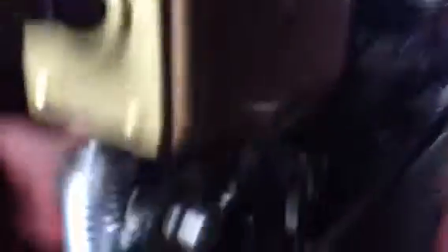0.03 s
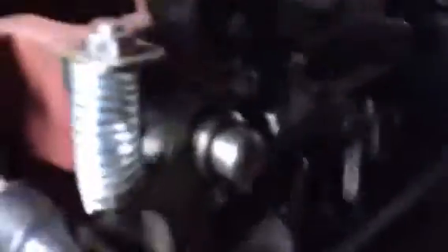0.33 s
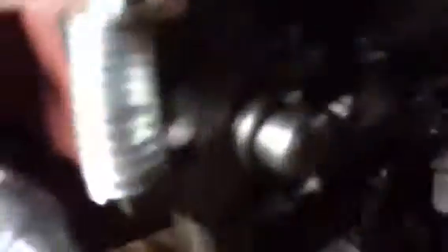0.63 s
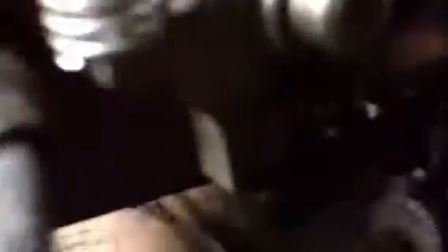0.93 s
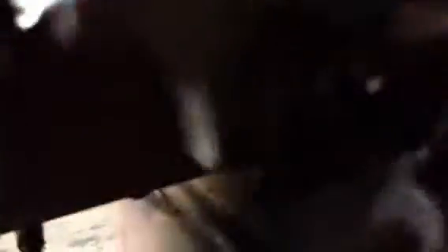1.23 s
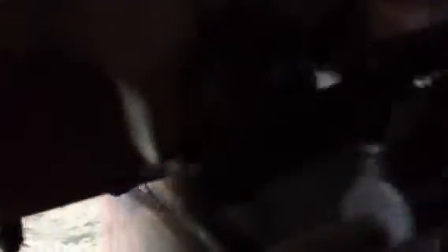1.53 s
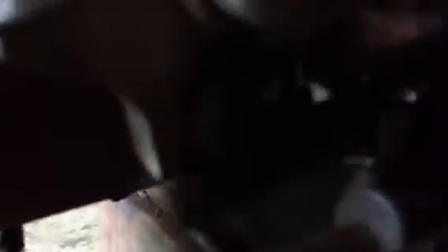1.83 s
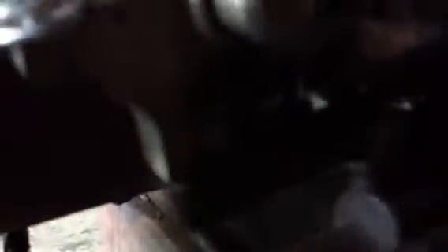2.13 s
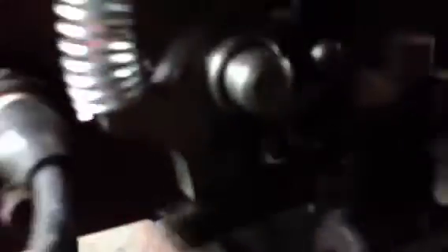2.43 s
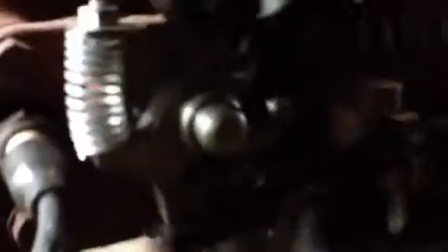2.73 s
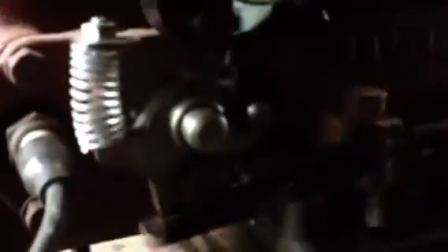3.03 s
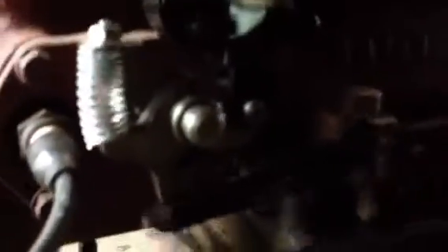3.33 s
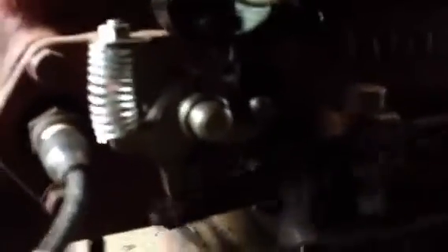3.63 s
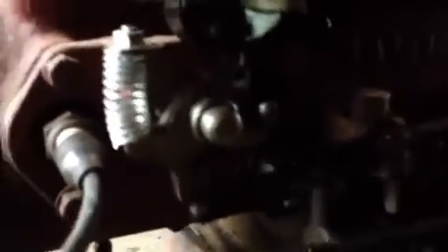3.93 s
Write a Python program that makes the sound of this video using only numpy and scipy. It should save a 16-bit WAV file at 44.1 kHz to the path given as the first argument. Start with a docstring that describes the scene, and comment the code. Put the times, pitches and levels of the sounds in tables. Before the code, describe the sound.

An old single-cylinder engine clatters close by in a shed, about three and a half beats a second. Each beat has a sharp steel tap, loose rattles, a double clack and a hollow chuff over whirring gears. Roughly every third fires with a knock, hiss and deeper thump. At 1.1 seconds the sound cuts out, returning briefly louder at 1.4 and running steadily until about 4 seconds.

```python
"""Old single-cylinder engine in a shed

The microphone is close to the valve gear as the engine turns over slowly. Each cycle brings a sharp
steel tap, loose rattles, a double clack and a hollow chuff of gas; about every third one fires with
a knock, a hiss and a deeper thump. Gears whirr underneath and the near walls add a short tail.
Just after one second the sound cuts out for a third of a second, then comes back briefly louder."""
import sys
import numpy as np
from scipy import signal
from scipy.io import wavfile
from scipy.ndimage import uniform_filter1d

SR = 44100
rng = np.random.default_rng(int(sys.argv[2]) if len(sys.argv) > 2 else 0)


def store_pcm(level_fs):
    """Save levels as 16-bit WAV."""
    pcm = np.round(np.clip(level_fs, -1, 1) * 32767).astype(np.int16)
    wavfile.write(sys.argv[1], SR, np.atleast_2d(pcm).T)


N = 176400
TIME = np.arange(N) / SR
AFTER_DB, AFTER_S = -20, .013  # after-ring of a steel contact: level and decay time
RATTLE_SPREAD_DB = 1.6

# Engine cycles. Each row: time of the tap in seconds, 1 if it fires or 0 if it coasts,
# then the gains in dB of tap, clack, knock and chuff.
CYCLES = [(-.269, 0, 0, 0, 0, 0), (.018, 0, 0, -1, -8, -2), (.305, 1, -3, 0, -1, 0), (.590, 0, 0, 1, -8, 0),
          (.876, 1, -1, 1, -3, 0), (1.16, 0, 0, 0, -8, -1), (1.447, 1, 0, 0, -4, -1),
          (1.732, 0, -1, 0, -7, 0), (2.017, 0, 0, 0, -8, 0), (2.306, 1, -2, 0, 0, 0),
          (2.5928, 0, 1, 1, -7, 0), (2.8805, 0, -1, 1, -5, 0), (3.1722, 1, -3, 0, 1, 1),
          (3.4605, 0, 0, 1, -5, 1.5), (3.7493, 1, -2, 0, 2, 0)]
# Resonances of the casting and the valve port. Each row: centre in Hz, width in Hz, strength in dB.
CASTING_MODES = [(195, 25, -2), (350, 16, 3), (568, 34, 1), (750, 24, 5), (920, 30, -2), (1125, 45, 4),
                 (1310, 45, -6), (1861, 40, 3)]
PORT_MODES = [(1660, 100, 0), (2330, 50, 3), (2860, 70, 1), (3260, 45, 12), (3730, 35, 5), (5260, 80, 7)]


def valve_gear():
    """Tap, double clack and the rattles of a loose linkage ring the same steel parts."""
    # Blows. Each row: seconds into the cycle, level in dB, decay in seconds.
    taps = [(.0003, -6.7, .002), (.0062, -14.5, .0023)]
    clacks = [(.0783, -9.3, .0024), (.0853, -14.5, .0028), (.0893, -8.7, .003)]
    # Each row: seconds into a firing cycle, seconds into a coasting one, level in dB, length in seconds.
    rattles = [(-.023, -.023, -28, .004), (-.018, -.014, -23.5, .008), (-.006, -.005, -30, .005),
               (.012, .017, -19.5, .008), (.036, .04, -22, .012), (.057, .06, -24.5, .009),
               (.13, .136, -30, .009), (.236, .236, -31, .004), (.254, .251, -35, .005)]
    # Each: start in seconds, level in dB, length in seconds.
    latch = (.161, -19.5, .009)  # timed within each coasting cycle
    return_rattle = (1.4245, -15, .007)  # the usual rattle before the tap, louder as the sound returns
    # Spectra. Each row: frequency in Hz, relative level in dB.
    tap_colour = [(100, -26), (800, -14), (1800, -10), (3800, -5), (6000, -4), (8000, 0), (9800, -8.5),
                  (13200, 1), (15500, -7)]
    clack_colour = [(100, -25), (600, -7), (1100, -.5), (2300, 0), (3100, -3.5), (4200, -1.5), (6500, 0),
                    (8300, .5), (9800, -6), (12500, -2), (15500, -8)]
    rattle_colour = [(100, -35), (1500, -14), (3500, -11), (6000, -8), (7500, 1), (8600, -3), (9800, -14),
                     (12500, -8.5), (15500, -16)]
    # Resonances. Each row: centre in Hz, width in Hz, strength in dB.
    steel_modes = [(2370, 120, 3), (2890, 120, 0), (3920, 140, 2), (4540, 80, 2), (5285, 80, 1),
                   (6046, 50, 2), (7690, 90, 2), (8820, 70, 4), (12100, 120, 0), (12570, 80, 1),
                   (13500, 140, 1)]
    loose = np.zeros(N)
    for start, fires, *_ in CYCLES:
        rows = [(firing if fires else coasting, db, length) for firing, coasting, db, length in rattles]
        for offset, db, length in rows + ([] if fires else [latch]):
            jitter = .0005 * rng.standard_normal()
            add(loose, start + offset + jitter, rattle(db, length))
    add(loose, return_rattle[0], rattle(*return_rattle[1:]))
    tap = blows(taps, [(start, db) for start, _, db, *_ in CYCLES])
    clack = blows(clacks, [(start, db) for start, _, _, db, *_ in CYCLES])
    return (colour(tap, tap_colour, steel_modes) + colour(clack, clack_colour, steel_modes)
            + colour(loose, rattle_colour, steel_modes))


def blows(contacts, starts, alike=.45, contact_s=.00018, spread_db=.9):
    """Hard steel contacts: a dense burst that is partly the same each time, and a short after-ring."""
    out, t = np.zeros(N), TIME[:SR // 12]
    for offset, db, decay in contacts:
        common = rng.standard_normal(len(t))
        attack = np.minimum(t / contact_s, 1)
        shape = attack * (np.exp(-t / decay) + amp(AFTER_DB) * np.exp(-t / AFTER_S))
        for start, gain_db in starts:
            burst = np.sqrt(alike) * common + np.sqrt(1 - alike) * rng.standard_normal(len(t))
            level = amp(db + gain_db + spread_db * rng.standard_normal())
            add(out, start + offset, level * shape * burst)
    return out


def rattle(db, length, contacts_per_s=800, decay_s=.0011):
    """A loose part chatters: a quick cluster of tiny contacts that swells and fades."""
    t, power = TIME[:SR // 20], 0
    count = max(round(contacts_per_s * length), 1)
    for k, (when, force) in enumerate(rng.random((16, 2))[:count]):
        age = np.maximum(t - (k + when) * length / count, 0)
        arch = np.sin(np.pi * (k + .5) / count)
        ring = np.exp(-age / decay_s) + amp(AFTER_DB) * np.exp(-age / AFTER_S)
        power = power + arch * (.5 + force) * (age > 0) * ring ** 2
    level = amp(db + RATTLE_SPREAD_DB * rng.standard_normal())
    return level * np.sqrt(power * length * SR / power.sum()) * rng.standard_normal(len(t))


def cylinder():
    """A knock tops each compression and the body knocks too; a firing adds clank, spit and hiss."""
    # Swells. Each: seconds into the cycle, level in dB, then rise, hold and decay in seconds.
    knock_swell = (.1428, -18, .0015, .015, .012)
    spit_swell = (.1525, -18, .003, .003, .004)
    hiss_swell = (.158, -27, .01, .012, .028)
    clank_swell = (.154, -26.5, .002, .004, .005)
    body_swells = [(-.014, -28, .008, .008, .01), (.03, -32, .006, .02, .02), (.058, -30, .004, .008, .015),
                   (.085, -26.3, .006, .01, .026), (.165, -32, .008, .015, .015)]
    return_swell = (1.416, -18.5, .002, .024, .012)  # a loud low surge as the sound returns, timed from the scene's start
    # Spectra. Each row: frequency in Hz, relative level in dB.
    knock_colour = [(80, -30), (250, -9), (700, -2), (1200, -2), (1800, 2), (2400, -8), (3400, -7),
                    (4500, -20), (15000, -40)]
    hiss_colour = [(100, -25), (1000, -4), (3500, 1), (5000, -2), (7500, 0), (10000, -5), (13000, -5),
                   (15500, -10)]
    clank_colour = [(500, -25), (2400, -10), (3500, 0), (4600, -16), (15000, -35)]
    body_colour = [(60, -32), (130, -10), (250, -2), (500, 0), (800, -1), (1300, -7), (2500, -13),
                   (6000, -28), (15000, -45)]
    knock = swells([(start, db) for start, *_, db, _ in CYCLES], *knock_swell)
    firings = [(start, db) for start, fires, *_, db, _ in CYCLES if fires]
    leak = swells(firings, *spit_swell) + swells(firings, *hiss_swell)
    # A firing rings the port, the more the harder it knocks.
    clank = swells([(start, 2.2 * db) for start, db in firings], *clank_swell)
    body = sum(swells([(start, 0) for start, *_ in CYCLES], *row) for row in body_swells)
    body += swells([(0, 0)], *return_swell)
    return (colour(gas(knock), knock_colour, CASTING_MODES)
            + colour(gas(leak), hiss_colour)
            + colour(gas(clank), clank_colour, PORT_MODES)
            + colour(gas(body), body_colour, CASTING_MODES))


def exhaust():
    """Gas chuffs out through the casting and sings in the valve port."""
    # Swells. Each: seconds into the cycle, level in dB, then rise, hold and decay in seconds.
    chuff_swell = (.192, -23.8, .014, .032, .018)
    song_swell = (.194, -28.7, .008, .026, .009)
    # Spectra. Each row: frequency in Hz, relative level in dB.
    chuff_colour = [(60, -35), (130, -11), (250, -3), (500, 1.5), (850, -4), (1400, -9), (1900, -9),
                    (2600, -20), (5000, -30), (15000, -45)]
    song_colour = [(200, -25), (1000, -8), (1700, 1), (2500, -8), (3500, -7), (4500, -17), (8000, -18),
                   (15000, -32)]
    starts = [(start, db) for start, *_, db in CYCLES]
    chuff = gas(swells(starts, *chuff_swell))
    song = gas(swells(starts, *song_swell))
    return colour(chuff, chuff_colour, CASTING_MODES) + colour(song, song_colour, PORT_MODES)


def pipe_thumps(spread_db=1.5):
    """Short gliding booms of the air in the pipes."""
    # Each row: middle in seconds into the cycle, width in seconds, pitch in Hz,
    # glide in octaves per second, level in dB when firing, level in dB when coasting.
    booms = [(.098, .011, 230, -5, -29, -40), (.124, .014, 145, -6, -35, -31),
             (.17, .024, 145, 0, -36, -39), (.216, .02, 122, 22, -35.5, -50),
             (.239, .012, 190, 8, -26, -29.5), (.285, .017, 140, -8, -36, -37)]
    out, t = np.zeros(N), TIME[:SR // 7] - TIME[SR // 14]
    for start, fires, *_ in CYCLES:
        for offset, width, hz, glide, firing_db, coasting_db in booms:
            octaves = glide * t + .06 * rng.standard_normal()
            turns = np.cumsum(hz * 2 ** octaves) / SR + rng.random()
            db = (firing_db if fires else coasting_db) + spread_db * rng.standard_normal()
            envelope = np.sqrt(2) * amp(db) * np.exp(-(t / width) ** 2)
            add(out, start + offset + t[0], envelope * np.sin(2 * np.pi * turns))
    return out


def pings_and_squeaks(ping_hz=8830, ping_s=.008, squeak_hz=5330, squeak_s=.02, glide_hz_per_s=-7000):
    """A thin steel part pings after tap and clack; a faint squeak falls during each chuff."""
    # Each row: seconds into the cycle, level in dB.
    pings = [(.0055, -20), (.0895, -25)]
    out, t = np.zeros(N), TIME[:SR // 10]
    centred = t - t.mean()
    squeak_envelope = amp(-41) * np.exp(-(centred / squeak_s) ** 2)
    for start, *_ in CYCLES:
        for offset, db in pings:
            turns = ping_hz * (1 + .004 * rng.standard_normal()) * t + rng.random()
            level = amp(db + RATTLE_SPREAD_DB * rng.standard_normal())
            add(out, start + offset, level * np.exp(-t / ping_s) * np.sin(2 * np.pi * turns))
        waver = .012 * unit_rms(uniform_filter1d(rng.standard_normal(len(t)), size=60))
        hz = squeak_hz * (1 + waver) + glide_hz_per_s * centred
        add(out, start + .215 + centred[0], squeak_envelope * np.sin(2 * np.pi * np.cumsum(hz) / SR))
    return out


def gear_whirr(level_db=-31.5):
    """The gears make a steady, rough noise that rings the casting."""
    # Spectrum. Each row: frequency in Hz, relative level in dB.
    whirr_colour = [(25, -32), (55, -30), (90, -26), (150, -4), (350, 0), (700, 0), (1400, -6), (1850, -5),
                    (2700, -10.5), (4300, -15), (7800, -11), (9700, -18.5), (12600, -16), (15500, -21)]
    return colour(gas(amp(level_db)), whirr_colour, CASTING_MODES)


def shed(x, level_db=-16, t60_s=.25):
    """Nearby walls return a short diffuse tail, 6 ms behind the direct sound."""
    t = TIME[:SR // 2]
    tail = rng.standard_normal(len(t)) * amp(-60 * t / t60_s) * (t > .006)
    return amp(level_db) * signal.oaconvolve(x, tail / np.linalg.norm(tail))[:N]


def gas(envelope, roughness=.24):
    """Turbulent noise that sputters under an envelope."""
    sputter = unit_rms(uniform_filter1d(rng.standard_normal(N), size=90))
    return envelope * unit_rms(rng.standard_normal(N) * np.exp(roughness * sputter))


def swells(starts, offset, db, rise, hold, decay):
    """Envelopes that rise, hold and die away, one for each start (seconds, gain in dB)."""
    out, t = np.zeros(N), TIME[:SR // 5]
    shape = np.clip(t / rise, 0, 1) * np.exp(-np.clip((t - rise - hold) / decay, 0, 30))
    for start, gain_db in starts:
        add(out, start + offset, amp(db + gain_db) * shape)
    return out


def colour(x, spectrum, modes=(), size=4096):
    """Minimum-phase filter of unit energy: a broad spectrum with ringing resonances on top."""
    hz = abs(np.fft.fftfreq(size, 1 / SR))
    points_hz, points_db = np.transpose(spectrum)
    broad = amp(np.interp(np.log(hz + 1), np.log(points_hz), points_db))
    peaks = sum(amp(db) ** 2 / (1 + (2 * (hz - centre) / width) ** 2) for centre, width, db in modes)
    gain = unit_rms(broad * np.sqrt(1 + peaks))
    response = np.fft.ifft(np.exp(np.conj(signal.hilbert(np.log(gain))))).real
    return signal.oaconvolve(x, response[:size // 2])[:N]


def amp(db):
    """Decibels to gain."""
    return 10 ** (np.asarray(db) / 20)


def unit_rms(x):
    """Scales to rms 1."""
    return x / np.sqrt(np.mean(x ** 2) + 1e-20)


def add(mix, start, sound):
    """Mixes a sound in at a start in seconds."""
    at = round(start * SR)
    sound = sound[max(-at, 0):]
    part = mix[max(at, 0):][:len(sound)]
    part += sound[:len(part)]


def scene():
    """The engine close up on one microphone, with the shed around it."""
    engine = valve_gear() + pings_and_squeaks() + cylinder() + exhaust() + pipe_thumps() + gear_whirr()
    return (engine + shed(engine))[None]


def record(dry, ceiling=.8, top_hz=15650):
    """Peaks overload softly, the sound cuts out once, and the highest treble is cut off."""
    # Each row: time in seconds, gain in dB.
    dropout = [(1.084, 0), (1.086, -17), (1.115, -37), (1.121, -120), (1.416, -120), (1.418, 0)]
    overloaded = ceiling * np.tanh(dry / ceiling)
    gain = amp(np.interp(TIME, *np.transpose(dropout)))
    lowpass = signal.firwin(301, top_hz, window=("kaiser", 9), fs=SR)
    return signal.oaconvolve(overloaded * gain, lowpass[None], "same")


dry = scene()
out = record(dry)
store_pcm(out)
```